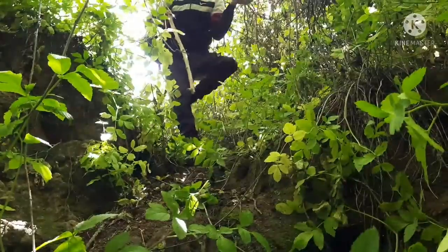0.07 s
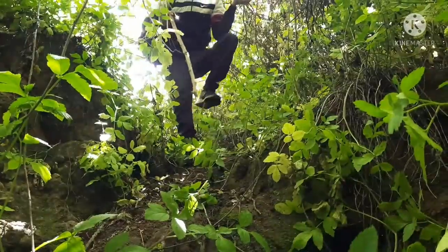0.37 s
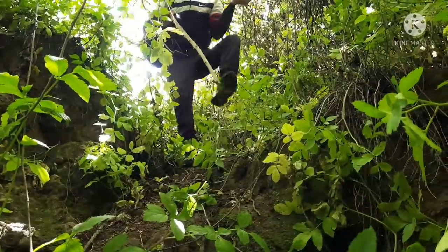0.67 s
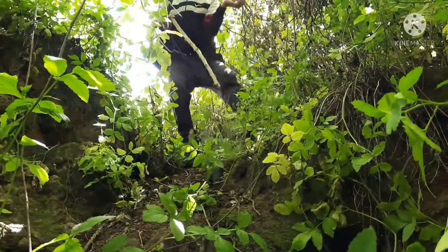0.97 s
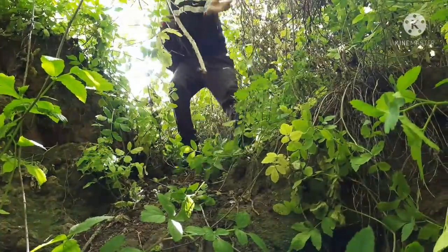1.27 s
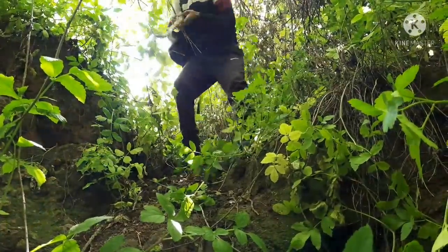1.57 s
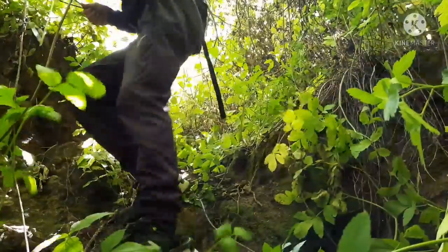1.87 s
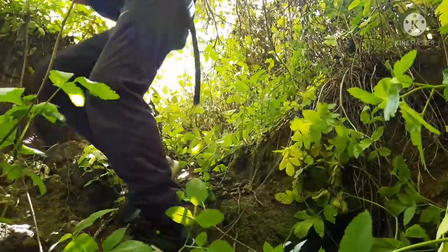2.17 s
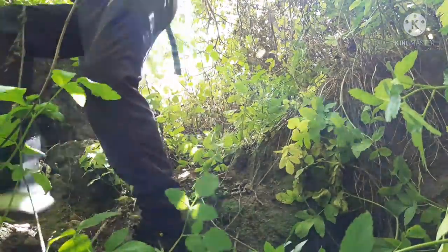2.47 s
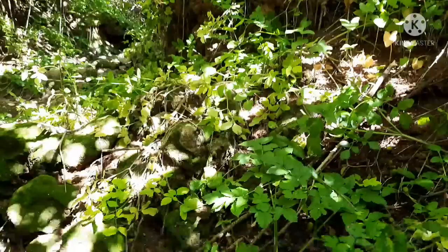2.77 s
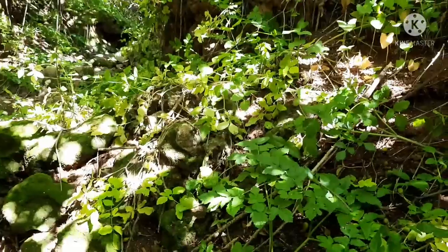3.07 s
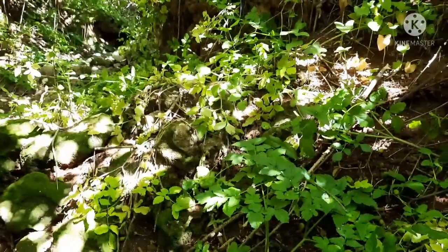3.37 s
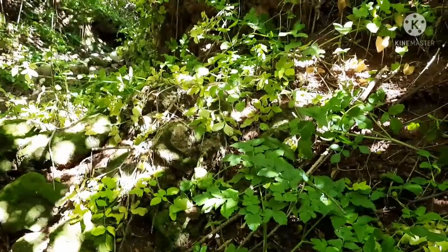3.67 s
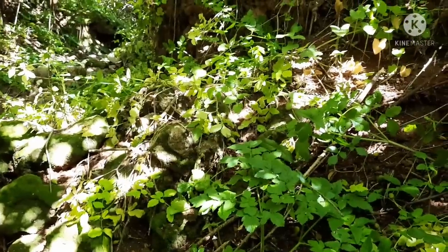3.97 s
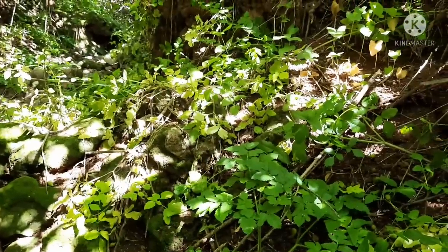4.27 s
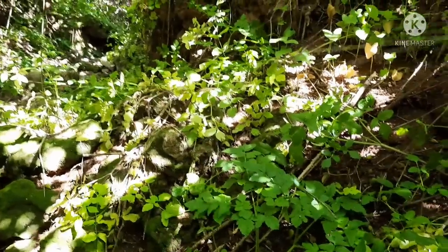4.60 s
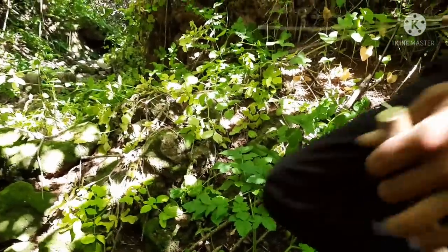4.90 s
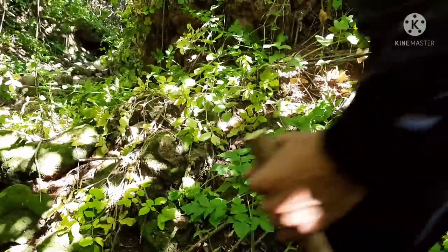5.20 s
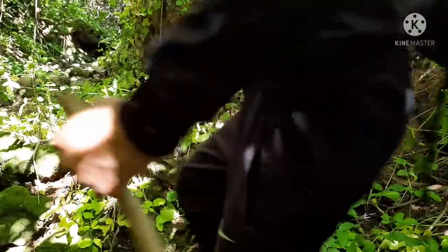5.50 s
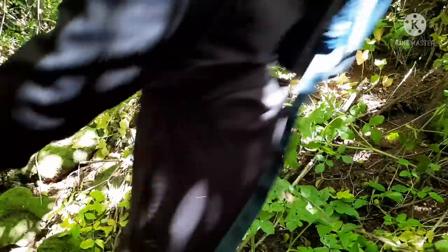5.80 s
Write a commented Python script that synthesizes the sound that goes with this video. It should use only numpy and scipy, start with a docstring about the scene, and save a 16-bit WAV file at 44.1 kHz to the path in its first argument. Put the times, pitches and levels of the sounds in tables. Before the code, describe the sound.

A hiker rustles through forest undergrowth with jingling zip pulls and faint birdsong, then passes close with cracking twigs, thudding boots and stick knocks.

```python
"""Leaves rustle, twigs snap and zip pulls jingle as a hiker with a stick climbs down a forest bank.
A songbird sings in the canopy, and under a low wind something like a far engine drones.
The scene then cuts abruptly to a quieter spot, where he pushes past the microphone: boots thud and
crunch on dry litter, his stick knocks on roots. Leaves and litter are showers of tiny fractures,
twigs crack and splinter, metal and ground ring when struck, and the trees scatter the sound."""
import sys
import numpy as np
from scipy import signal
from scipy.fft import rfft, irfft, next_fast_len
from scipy.io import wavfile
from scipy.ndimage import map_coordinates

SR = 44100
rng = np.random.default_rng(int(sys.argv[2]) if len(sys.argv) > 2 else 0)


def generate_wav(signal):
    """Clip the signal to [-1, 1] and save it as 16-bit WAV at the path in sys.argv[1]."""
    frames = np.transpose(np.atleast_2d(signal))
    scaled = np.clip(frames, -1, 1) * 32767
    pcm = np.round(scaled).astype(np.int16)
    wavfile.write(sys.argv[1], SR, pcm)


N = 266672
TIME = np.arange(N) / SR
CHANGE_S = 3.2   # the cut from the bank to the quieter spot

# Tone of wind on the microphone. Each row: frequency in Hz, level in dB.
WIND_SPECTRUM = [(30, -12), (45, -2), (62, 9.5), (115, -1), (155, -4), (195, -17.5), (300, -14.5),
                 (700, -49.5)]
# The hiker's place in the stereo image. Each row: time in seconds, left over right in dB,
# lag of the left side in milliseconds.
HIKER_PATH = [(0, 4.5, 0.055), (3.1, 4, -0.32), (4.7, 1.5, 0.41), (5.2, -1, 0.396), (6.05, 1, 0.029)]
# Twigs breaking. Each row: start in seconds, relative peak in dB, left over right in dB,
# weight of the crack's midrange body in dB.
TWIG_SNAPS = [(0.148, -54, 6, 13), (0.2666, -32, 4, -52), (1.1344, -19.5, 10.5, -16.5),
              (1.9732, -30, 6, -14), (2.0859, -28, 3, -9.5), (2.746, -32, 4, -8.5), (3.1, -33, 8, -6),
              (3.1267, -29, 6, -25), (3.131, -38.5, 13, 14), (4.094, -39.5, 8, -52),
              (4.4822, -32.5, 13, -13), (4.52, -31.5, 0, -20), (4.8869, -28, -1, -9.5),
              (4.9436, -25, -3, -18), (5.101, -22, -14, -19.5), (5.1688, -15.5, 1, -24.5),
              (5.2837, -18, 10, -9.5), (5.33, -12.5, -6, -25), (5.337, -20, -9, -3), (5.3647, -15, -5, -9),
              (5.411, -15, 2, -9), (5.443, -11.5, 0, -35), (5.465, -26.5, 5, -7), (5.489, -29, 6, -25),
              (5.7372, -25.5, 10, -20), (5.751, -20.5, 6, -19), (5.7789, -19, 9, -10),
              (5.808, -19, 19, -25), (5.92, -16.5, 6, -7), (5.966, -15, 9, -25), (5.991, -12.5, 0, -19.5),
              (6.0085, -4, 7, -16.5)]


def from_db(db):
    """Decibels to gain."""
    return 10 ** (np.asarray(db) / 20)


def rms_one(x):
    """Scale to rms 1."""
    return x / np.sqrt(np.mean(x ** 2) + 1e-20)


def in_time(rows):
    """Turn rows that start with a time into one curve for each further column."""
    times, *columns = np.transpose(rows)
    return [np.interp(TIME, times, column) for column in columns]


def drift(per_s):
    """A random wander of rms 1, with `per_s` turning points a second."""
    knots = rng.standard_normal(8192)
    return rms_one(np.interp(TIME * per_s, np.arange(len(knots)), knots))


def panned(pan_db):
    """Left and right gains; positive leans left."""
    gains = from_db(np.array([[.5], [-.5]]) * pan_db)
    return gains / gains.mean(axis=0)


def colour(x, spectrum):
    """Minimum-phase EQ through (Hz, dB) points; keeps the power of white noise."""
    size = 2 * next_fast_len(x.shape[-1] // 2 + 2048)
    hz, db = np.transpose(spectrum)
    bin_hz = np.arange(size // 2 + 1) * SR / size
    gain = rms_one(from_db(np.interp(np.log(bin_hz + 1), np.log(hz), db)))
    fold = 2. * (np.arange(size) < size // 2)   # folding the cepstrum keeps attacks free of pre-ring
    fold[0] = 1
    response = np.exp(rfft(irfft(np.log(gain)) * fold))
    return irfft(rfft(x, size) * response)[..., :x.shape[-1]]


def ring(x, hz, t60):
    """A resonator: a unit click sets a sine of height 1 ringing."""
    radius, angle = from_db(-60 / (t60 * SR)), 2 * np.pi * hz / SR
    return signal.lfilter([0, np.sin(angle)], [1, -2 * radius * np.cos(angle), radius ** 2], x + 1e-18)


def band(x, low_hz, high_hz):
    """Gentle band-pass."""
    sos = signal.butter(1, [low_hz, min(high_hz, .45 * SR)], "band", fs=SR, output="sos")
    return signal.sosfilt(sos, x + 1e-18)


def add(track, start_s, sound):
    """Mix a sound into a track."""
    i = max(round(start_s * SR), 0)
    track[..., i:i + sound.shape[-1]] += sound[..., :max(N - i, 0)]


def stereo_noise(alike, size):
    """White noise, from wide (alike = 0) to mono (alike = 1)."""
    mid, side = rng.standard_normal((2, size))
    return np.sqrt((1 + alike) / 2) * mid + np.sqrt((1 - alike) / 2) * side * [[1], [-1]]


def grains(per_s, spread_db, alike, size):
    """Random tiny clicks of uneven strength; rms 1."""
    strengths = from_db(spread_db * np.minimum(rng.exponential(1, size), 4))
    return rms_one(stereo_noise(alike, size) * strengths * (rng.random(size) < per_s / SR))


def woodland(x, t60):
    """Dense scatter from trunks, leaves and banks, different at each ear."""
    t = TIME[:SR]
    scatter = rng.standard_normal((2, SR)) * from_db(-60 * t / t60) * (t > .002)
    return signal.fftconvolve(np.atleast_2d(x), rms_one(scatter) / np.sqrt(SR), axes=1)[:, :N]


def forest_air():
    """A faint, steady bed of bass-heavy noise."""
    # Tone of the air. Each row: frequency in Hz, level in dB.
    air_spectrum = [(25, -14), (70, 15.5), (130, -3), (300, -6), (600, -15), (1200, -19.5), (2500, -23),
                    (6000, -30.5), (16000, -27)]
    return from_db(-69) * colour(stereo_noise(0.41, N), air_spectrum)


def wind_and_rumble(drone_gain, wind_db, rumble_db):
    """Steady wind on the microphone, plus a rumble that rises and falls with the drone."""
    gain = np.hypot(from_db(wind_db), from_db(rumble_db) * drone_gain)
    return gain * colour(stereo_noise(0.64, N), WIND_SPECTRUM)


def gust(peak_s, width_s, db):
    """One soft puff of air on the microphone."""
    swell = from_db(db) * np.exp(-((TIME - peak_s) / width_s) ** 2)
    return swell * colour(stereo_noise(1, N), WIND_SPECTRUM)


def drone_effort(idle_db, run_s, run_db, run_hz, upper_s, upper_db, upper_db_per_s, rise_s):
    """The drone swells three times over an idle, then runs on as an upper tone grows against it."""
    # The drone's swells. Each row: start in seconds, length in seconds, level in dB, pitch in Hz.
    swells = [(-0.04, 0.37, -51.5, 76.25), (0.489, 0.5, -49, 82.36), (1.061, 0.57, -42, 82.1)]
    lower_gain = from_db(idle_db) + from_db(run_db) * np.clip((TIME - run_s) / rise_s, 0, 1)
    for start, length, db, _ in swells:
        progress = np.clip((TIME - start) / length, 0, 1)
        lower_gain += from_db(db) * np.abs(np.sin(np.pi * progress)) ** 0.74   # a broad arch
    pitches = [(start + length / 2, hz) for start, length, _, hz in swells]
    lower_hz, = in_time(pitches + [(run_s, run_hz)])
    upper_age = TIME - upper_s
    upper_gain = from_db(upper_db + upper_db_per_s * upper_age) * np.clip(upper_age / rise_s, 0, 1)
    return lower_gain, lower_hz, upper_gain


def drone(gain, hz, octave_db, waver_db):
    """A wavering low tone with a weak octave, like an engine far off."""
    phase = 2 * np.pi * np.cumsum(hz * (1 + 0.0165 * drift(6.7))) / SR
    tone = np.sin(phase) + from_db(octave_db) * np.sin(2 * phase)
    return np.sqrt(2) * gain * from_db(waver_db * drift(34)) * tone


def songbird(gain_db, flutter_db, echo_db, echo_s):
    """Clear and burry notes swell, glide, level off and fade; the trees scatter them."""
    # The song. Each row: start in seconds, length in seconds, first and last pitch in Hz,
    # relative level in dB, burr as a share of the pitch.
    notes = [(0.146, 0.31, 3100, 3670, -74, 0.078), (0.464, 0.064, 3630, 3430, -72.5, 0.013),
             (0.546, 0.12, 3740, 4280, -71, 0.0091), (0.715, 0.044, 4160, 4370, -70, 0.0091),
             (0.735, 0.125, 4390, 5160, -74.5, 0.0086), (0.842, 0.035, 5000, 4320, -72, .008),
             (1.489, 0.13, 4400, 3550, -75, 0.055), (1.875, 0.2, 3880, 3235, -70, 0.036),
             (2.103, 0.091, 2800, 3440, -63.5, 0.045), (2.162, 0.054, 3500, 4660, -63, 0.084),
             (2.28, 0.075, 4570, 3750, -63, 0.096), (2.47, 0.052, 2710, 2636, -64.5, 0.046),
             (2.656, 0.092, 3210, 3010, -61, 0.045), (2.751, 0.044, 2590, 2413, -59, 0.044),
             (3.32, 0.1, 2170, 2070, -85, 0.023), (3.583, 0.08, 4750, 4430, -91, 0.052),
             (3.61, 0.11, 1990, 1905, -85, 0.025), (3.618, 0.085, 2920, 3170, -87, 0.11),
             (3.79, 0.32, 593, 568, -88, 0.073), (3.949, 0.067, 2250, 2390, -82, 0.061)]
    song, wobble = np.zeros(N), drift(600)
    for start, length, first_hz, last_hz, db, burr in notes:
        progress = np.linspace(0, 1, round(length * SR))
        glide_hz = last_hz + (first_hz - last_hz) * (1 - progress) ** 2
        hz = glide_hz * (1 + burr * wobble[round(start * SR):][:len(progress)])
        add(song, start, from_db(db) * np.sin(np.pi * progress) * np.sin(2 * np.pi * np.cumsum(hz) / SR))
    song = from_db(gain_db) * song * rms_one(from_db(flutter_db * drift(70)))
    return song + from_db(echo_db) * woodland(song, t60=echo_s)


def stir(steady_db, soil_db, shake_db, settle_s=0.06):
    """Leaf and soil envelopes in dB: a steady stir, a swell for each sweep, leaves shaken by snaps."""
    # A leg or sleeve sweeps through a plant. Each row: strongest moment in seconds, length in seconds,
    # relative level of the leaves in dB, relative level of soil and cloth in dB.
    sweeps = [(0.022, 0.14, -62.5, -80), (0.456, 0.088, -71, -94), (1.093, 0.17, -66, -65),
              (1.48, 0.61, -69, -66), (1.926, 0.17, -60, -53), (2.753, 0.14, -60.5, -54.5),
              (2.966, 0.037, -50, -45.5), (3.033, 0.072, -53, -71), (3.161, 0.081, -53, -53.5),
              (3.99, 0.13, -70.5, -105), (4.434, 0.14, -59.5, -70), (4.535, 0.053, -56.5, -57.5),
              (4.67, 0.08, -56.5, -53.5), (4.908, 0.15, -79, -59.5), (5.117, 0.031, -44.5, -44),
              (5.242, 0.046, -45.5, -48.5), (5.461, 0.037, -39, -43), (5.656, 0.12, -51, -88),
              (5.792, 0.084, -41, -50.5), (5.951, 0.097, -39.5, -45)]
    power = from_db([steady_db, steady_db + soil_db]) ** 2
    for peak_s, length, *levels_db in sweeps:
        width_s = length * np.where(TIME < peak_s, 0.36, 0.78)   # quick rise, slower fall
        swell = np.exp(-np.minimum(((TIME - peak_s) / width_s) ** 2, 50))
        power += from_db(levels_db)[:, None] ** 2 * swell
    for start, db, *_ in TWIG_SNAPS:
        shake = from_db(db + shake_db) * np.exp(-TIME[:SR // 2] / settle_s)
        add(power[0], start, shake ** 2)
    return 10 * np.log10(power)


def rustle(envelopes, spectrum, leaves_gain_db, soil_gain_db, per_s, spread_db, slide_db, flutter_db):
    """Leaves tick and slide, each size in its own octave; soil and cloth scuff below."""
    # Tone of soil and cloth. Each row: frequency in Hz, level in dB.
    soil_spectrum = [(70, -12), (150, -9), (220, -11), (310, 5.5), (470, -8), (720, -1), (1100, -7),
                     (2000, -6), (5000, -35.5)]
    leaves_db, soil_db = envelopes
    clumps, leaves = drift(55), 0
    ticks = grains(per_s, spread_db, 0.097, N)
    for low_hz in 500 * 2 ** np.arange(5):
        slide = from_db(slide_db) * grains(6000, 0.36, 0.034, N)
        staggered_ticks = np.roll(ticks, low_hz // 20)
        flutter = from_db(flutter_db * (clumps + drift(45)))
        leaves = leaves + band(staggered_ticks + slide, low_hz, 2 * low_hz) * flutter
    leaves = rms_one(leaves) * from_db(leaves_db + leaves_gain_db)
    leaves = colour(leaves, spectrum) * panned(in_time(HIKER_PATH)[0])
    soil = grains(900, 2.1, 0.69, N) * from_db(soil_db + soil_gain_db + flutter_db * clumps)
    return leaves + colour(soil, soil_spectrum) * panned(1.6)


def bank_undergrowth():
    """A bright, sliding rustle that grows as he comes down the bank."""
    # Tone of the leaves on the bank. Each row: frequency in Hz, level in dB.
    leaf_spectrum = [(500, -8), (1200, 0.5), (2800, 2.5), (5000, 3.5), (7500, 4.5), (10000, 0),
                     (13000, 5.5), (16000, 4)]
    envelopes = stir(steady_db=-81.5 + 7 * TIME, soil_db=-8, shake_db=-30.5)
    return rustle(envelopes, leaf_spectrum, leaves_gain_db=6, soil_gain_db=-7,
                  per_s=290, spread_db=7, slide_db=8, flutter_db=0)


def near_undergrowth():
    """Leaves rustle in clumps as he nears the second spot and pushes past."""
    # Tone of the close leaves. Each row: frequency in Hz, level in dB.
    leaf_spectrum = [(500, 0), (1200, -5), (2500, -5), (4000, -1.5), (6500, -1), (10000, -3.5), (13000, -6),
                     (16000, 1)]
    # The steady stir of his approach. Each row: time in seconds, relative level in dB.
    approach = [(3.3, -77), (3.88, -95.5), (4.55, -60.5), (5.05, -60.5), (5.39, -46), (5.68, -64),
                (6.0, -62)]
    envelopes = stir(steady_db=in_time(approach)[0], soil_db=-11.5, shake_db=-35)
    return rustle(envelopes, leaf_spectrum, leaves_gain_db=3.5, soil_gain_db=3.5,
                  per_s=300, spread_db=2.5, slide_db=2, flutter_db=2)


def zip_pulls(touch_s, rattle_db, rattle_s, ring_db, clink_db, detune, strike_spread_db):
    """Metal pulls knock together, rattle briefly and ring a different mix of their modes each time."""
    # The knocks. Each row: start in seconds, relative level in dB.
    jingles = [(0.2644, -39.5), (1.135, -33.5), (1.5233, -33), (1.621, -43), (1.727, -42.5),
               (1.8421, -43.5), (1.871, -46), (2.0488, -43), (2.217, -32), (2.291, -35), (2.311, -41.5),
               (2.368, -28), (2.41, -41.5), (2.452, -43), (2.6545, -35), (2.724, -34.5)]
    # Modes of the metal. Each row: frequency in Hz, relative level in dB.
    modes = [(9850, -16.5), (10790, -13.5), (11100, -1), (11390, -11.5), (11960, -20), (12280, -16),
             (12660, -22), (13220, -9), (13850, -3), (14520, 0), (15050, 1)]
    # Tone of the contact noise. Each row: frequency in Hz, level in dB.
    clink_spectrum = [(1500, -20), (4000, -6), (7500, -0.5), (9500, -0.5), (11500, 16), (15000, 9),
                      (16500, -24)]
    metal, t = np.zeros((2, N)), TIME[:SR // 4]
    for start, db in jingles:
        knock = grains(5900, 0.81, 0.97, len(t)) * np.exp(-t / touch_s)
        rattle = from_db(rattle_db) * grains(300, 2.7, 0.62, len(t)) * np.exp(-t / rattle_s)
        touches = (knock + rattle) * (1 - np.exp(-t / .002))
        jingle = from_db(clink_db) * colour(touches, clink_spectrum)
        for hz, mode_db in modes:
            bend, strike = rng.standard_normal(2)   # pressing on each other shifts pitch and strength
            gain = from_db(ring_db + mode_db + strike_spread_db * strike)
            jingle += gain * ring(touches, hz * (1 + detune * bend), t60=0.09)
        add(metal, start, from_db(db) * jingle)
    return (metal + from_db(1) * woodland(metal, t60=0.25)) * panned(9.3)


def skid(start_s, length_s, db, hz):
    """A sole slips under load: quick catches ring one narrow resonance."""
    out, progress = np.zeros((2, N)), np.linspace(0, 1, round(length_s * SR))
    catches = grains(2900, -8, 0.98, len(progress))
    rasp = rms_one(ring(catches, hz, t60=0.0029))
    add(out, start_s, from_db(db) * np.sin(np.pi * progress) * rasp)
    return out


def litter_crunches(per_s, spread_db, fade_s, fringe_db):
    """A sole breaks a dense run of dry leaves and stalks."""
    # Litter crushed or scraped. Each row: start in seconds, hold in seconds, relative level in dB,
    # band centre in Hz.
    crunches = [(0.027, 0.054, -61.5, 6000), (0.055, 0.038, -59.5, 2900), (1.905, 0.068, -54, 730),
                (2.732, 0.041, -60.5, 2900), (5.1, 0.011, -47.5, 2820), (5.279, 0.0063, -55, 1690),
                (5.361, 0.056, -37, 5260), (5.374, 0.025, -35, 2540), (5.93, 0.065, -39.5, 3330)]
    out, t = np.zeros((2, N)), TIME[:SR // 4]
    for start, hold, db, hz in crunches:
        breaks = grains(per_s, spread_db, .9 if hz < 1000 else .5, len(t))
        edges_hz = hz * 0.5, hz * 1.65
        crush = rms_one(band(band(breaks, *edges_hz), *edges_hz))
        fringe = from_db(fringe_db) * breaks * min(hz / 3000, 1)   # full-range crackle on top
        envelope = np.exp(-np.maximum(t - hold, 0) / fade_s)
        add(out, start, from_db(db) * (crush + fringe) * envelope)
    return out * panned(in_time(HIKER_PATH)[0])


def boots_and_stick(boot_hz, weight_hz, weight_db, cycles, earth_db, earth_s):
    """A blow on the ground rings for a few cycles and shakes the loose earth."""
    # Boots landing. Each row: start in seconds, relative level in dB.
    boots = [(2.085, -39), (2.712, -35), (2.971, -46), (4.889, -42), (4.945, -37), (5.105, -33.5),
             (5.275, -28), (5.331, -18), (5.338, -27), (5.365, -16.5), (5.381, -20), (5.982, -26),
             (5.994, -21)]
    # The stick on roots. Each row: start in seconds, relative level in dB, pitch in Hz.
    knocks = [(2.087, -39.5, 522), (2.7475, -41, 750), (5.272, -22, 1430), (5.413, -17.5, 740),
              (5.737, -27.5, 740), (5.761, -26, 660), (5.7806, -17, 686), (5.921, -19.5, 667),
              (5.9445, -17.5, 644)]
    out, t = np.zeros((2, N)), TIME[:SR // 8]
    soles = [(start, db, boot_hz * np.exp(0.055 * rng.standard_normal())) for start, db in boots]
    body_weight = [(start, db + weight_db, weight_hz) for start, db in boots]
    for blows, wave in ((soles + body_weight, np.sin), (knocks, np.cos)):   # sine: soft; cosine: hard
        for start, db, hz in blows:
            blow = wave(2 * np.pi * hz * t) * np.exp(-t * hz / cycles)
            earth = band(stereo_noise(0.96, len(t)), hz / 2, hz * 1.93)
            earth = rms_one(band(earth, 100, 330)) * np.exp(-t / earth_s)
            add(out, start, from_db(db) * (blow + from_db(earth_db) * earth))
    out = band(out, 100, 3000)
    return (out + from_db(-13) * woodland(out, t60=0.32)) * panned(0.61)


def twig_snaps(bend_s, break_s, splinter_db, splinter_s, gain_db, far_echo_db, near_echo_db):
    """A twig strains, gives way in one sharp crack, then its fibres splinter for a few milliseconds."""
    out, t = np.zeros((2, N)), TIME[:SR // 10] - bend_s
    for start, db, pan_db, body_db in TWIG_SNAPS:
        crack = stereo_noise(0.28, len(t)) * np.exp(-np.maximum(t, -2 * t) / break_s)
        crack /= np.abs(crack).max(axis=1, keepdims=True)
        splinters = grains(5000, 1.2, 0.42, len(t)) * np.exp(-np.abs(t) / splinter_s)
        wood_spectrum = [(500, -5.5), (1400, body_db + 13), (3200, body_db + 9),
                         (6000, -0.5), (12000, -2), (16000, -3)]
        snap = colour(crack + from_db(splinter_db) * splinters, wood_spectrum)
        snap /= np.abs(snap).max(axis=1).mean()
        add(out, start, snap * from_db(db + gain_db) * panned(pan_db))
    echo_db = np.where(TIME < CHANGE_S, far_echo_db, near_echo_db)
    echo_send = band(out, 2430, 15000) * from_db(echo_db)   # leaves scatter mostly treble
    return out + woodland(echo_send, t60=0.33)


def at_two_ports(x):
    """Sound from the hiker reaches the nearer microphone port first."""
    half_lag = in_time(HIKER_PATH)[1] / 2 * SR / 1000
    return np.array([map_coordinates(side, [np.arange(N) - sign * half_lag], order=5)
                     for side, sign in zip(x, (1, -1))])


def scene():
    """The bank, then the quieter spot; forest air and birdsong run through both."""
    lower_gain, lower_hz, upper_gain = drone_effort(
        idle_db=-67.5, run_s=1.59, run_db=-54.5, run_hz=81.4,
        upper_s=1.743, upper_db=-55.5, upper_db_per_s=6.5, rise_s=0.17)
    wind = wind_and_rumble(np.hypot(lower_gain, upper_gain), wind_db=-63, rumble_db=-5.5)
    hum = drone(lower_gain, lower_hz, octave_db=-21, waver_db=0)
    hum += drone(upper_gain, hz=104.4, octave_db=-23, waver_db=2.5)
    bank_leaves, near_leaves = bank_undergrowth(), near_undergrowth()
    air = forest_air()
    steps = boots_and_stick(boot_hz=299.5, weight_hz=165, weight_db=-12.5,
                            cycles=1.88, earth_db=-9, earth_s=0.0093)
    steps += litter_crunches(per_s=2500, spread_db=1, fade_s=0.011, fringe_db=3)
    steps += skid(start_s=5.383, length_s=0.03, db=-29, hz=3050)
    twigs = twig_snaps(bend_s=0.00126, break_s=0.0003, splinter_db=-18, splinter_s=0.0063,
                       gain_db=2.5, far_echo_db=-8, near_echo_db=-11.5)
    metal = zip_pulls(touch_s=0.0077, rattle_db=-5.5, rattle_s=0.0073, ring_db=-34.5, clink_db=-0.5,
                      detune=0.012, strike_spread_db=4)
    song = songbird(gain_db=6.5, flutter_db=1.5, echo_db=3, echo_s=0.55)
    puff = gust(peak_s=4.6, width_s=0.18, db=-65)
    on_bank = np.clip((CHANGE_S - TIME) / .006, 0, 1)
    # The hiker is muted briefly after the cut, so his tails do not ring across it.
    gate = np.maximum(on_bank, np.clip((TIME - CHANGE_S - .15) / .05, 0, 1))
    hiker = on_bank * (bank_leaves + metal) + gate * ((1 - on_bank) * near_leaves + steps + twigs)
    return air + on_bank * (wind + hum) + puff + song + at_two_ports(hiker)


def record(dry):
    """Each microphone port swallows a band near 9 kHz, the right more; deep bass and the top are cut."""
    left = dry[0] - .6 * signal.lfilter(*signal.iirpeak(9200, Q=7, fs=SR), dry[0])
    right = dry[1] - .8 * signal.lfilter(*signal.iirpeak(9350, Q=3.8, fs=SR), dry[1])
    low_cut = signal.butter(2, 45, "high", fs=SR, output="sos")
    high_cut = signal.ellip(10, .2, 80, 15550, fs=SR, output="sos")
    return signal.sosfilt(high_cut, signal.sosfilt(low_cut, [left, right]))


dry = scene()
out = record(dry)
generate_wav(out)
```